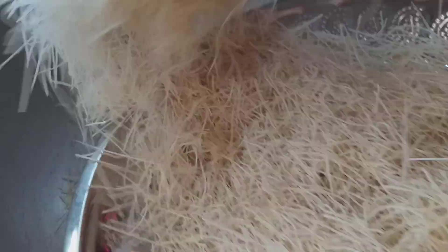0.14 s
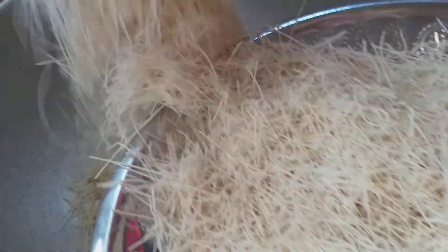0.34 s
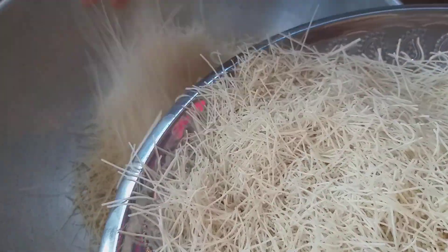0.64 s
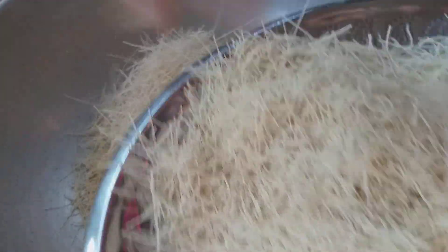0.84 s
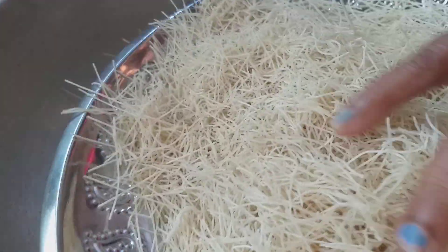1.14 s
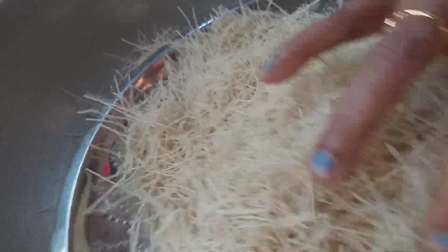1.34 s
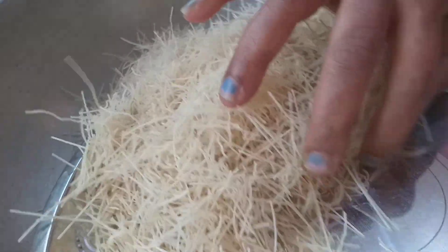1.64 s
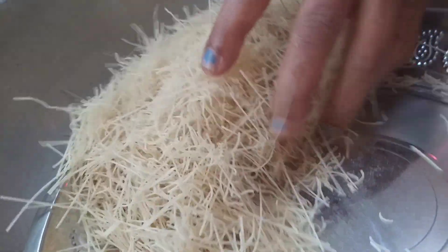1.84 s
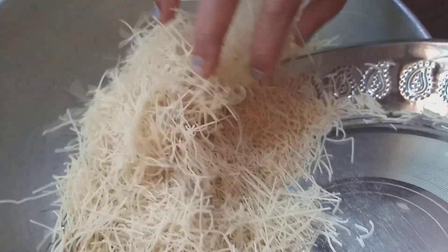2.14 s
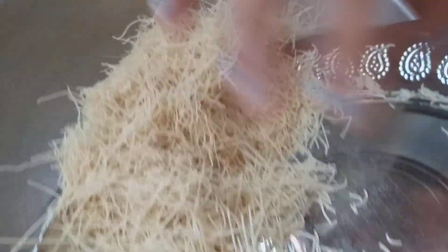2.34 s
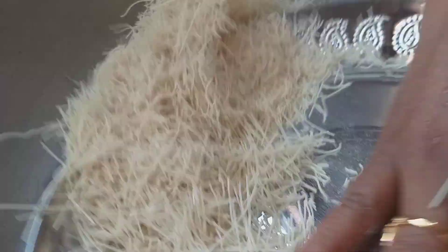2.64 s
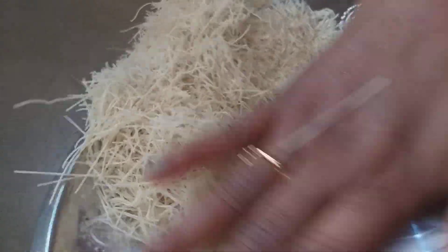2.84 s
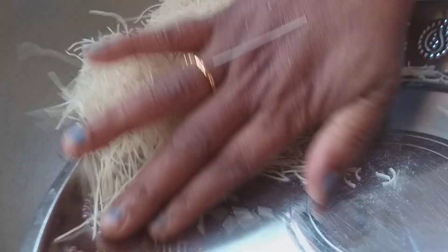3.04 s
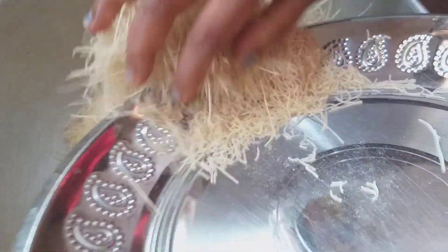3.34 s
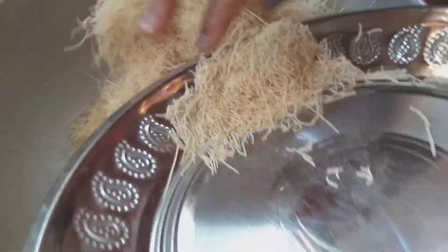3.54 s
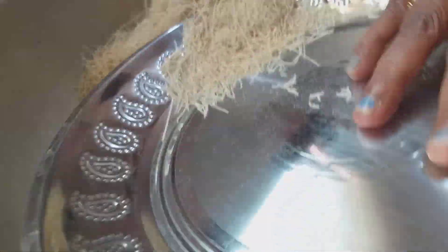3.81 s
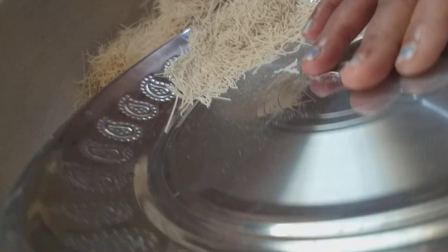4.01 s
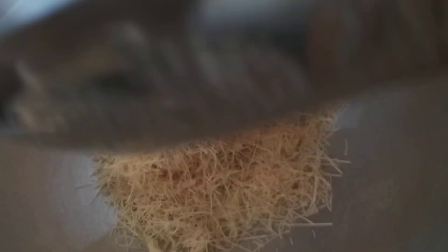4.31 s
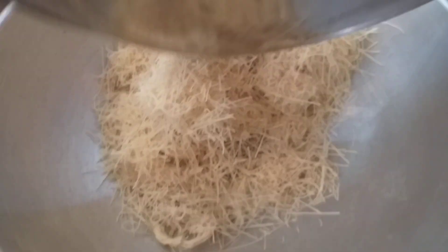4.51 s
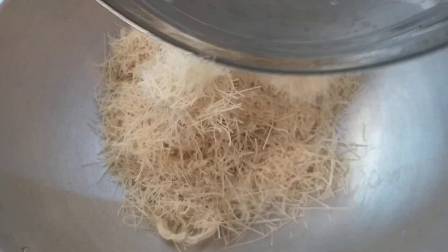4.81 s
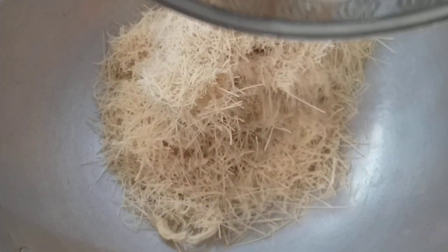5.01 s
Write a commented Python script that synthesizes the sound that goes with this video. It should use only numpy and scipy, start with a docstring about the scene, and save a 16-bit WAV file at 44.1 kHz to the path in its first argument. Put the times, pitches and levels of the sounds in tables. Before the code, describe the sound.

Bright crisp rustling of thin dry noodles swept in bursts from a metal plate into a pan, with sharp snaps and two knocks.

```python
"""Small kitchen with a mains hum: dry vermicelli is pushed by hand off a steel plate into a metal pan.
Strands patter as filtered random ticks; the heap rasps and drums on the plate and stirs the hollow below.
Snaps are cracks with splinter sprays; two knocks are noise bursts with a low flex, then a chatter.
Modes ring the steel, a dull boom fades at the start, soft touches leave notes, a short tail adds the room."""
import sys
import numpy as np
from scipy import signal
from scipy.io import wavfile
from scipy.ndimage import uniform_filter1d

SR = 44100
rng = np.random.default_rng(int(sys.argv[2]) if len(sys.argv) > 2 else 0)


def unload_audio(sound):
    """Save the sound as a 16-bit wav file, at the path given as the first command line argument."""
    columns = np.transpose(np.atleast_2d(sound))
    # keep every value between -1 and 1, then stretch to whole-number steps
    steps = np.round(np.clip(columns, -1, 1) * 32767)
    wavfile.write(sys.argv[1], SR, steps.astype(np.int16))


N = 227720
TIME_S = np.arange(N) / SR
BAND_EDGE_HZ = 15900

# shoves of the heap over the plate: full_force_s, hold_s, rise_s, rasp_db, drum_db, hollow_db
PUSHES = [(0, 0.36, 0.06, -33, -54.5, -57), (1.094, 0.067, .022, -32, -55, -64),
          (1.22, .11, 0.12, -28.5, -51, -59), (1.452, 0.14, 0.45, -26.5, -44.5, -57),
          (1.83, 0.15, 0.24, -27, -59, -54.5), (2.09, .11, 0.25, -34, -51.5, -54),
          (2.373, 0.18, 0.12, -43.5, -55, -58.5), (2.601, 0.034, 0.07, -25.5, -46, -51),
          (2.929, 0.038, 0.18, -18.5, -44.5, -43.5), (3.13, 0.098, 0.19, -21, -48, -53),
          (3.348, .03, .2, -28.5, -71, -53), (3.892, 0.041, 0.039, -36.5, -62, -53.5),
          (4.203, 0.32, 0.42, -50, -58, -55.5), (4.59, .07, 0.15, -29, -60, -73),
          (4.72, 0.03, .1, -34, -67, -47.5), (4.795, 0.0083, 0.024, -24, -53.5, -53)]
# clumps tipping over the rim into the pan: full_flow_s, hold_s, rise_s, level_db
FALLS = [(0, 0.21, .05, -25), (.285, 0.063, 0.12, -19), (.465, 0.019, 0.071, -24.5),
         (.62, 0.021, 0.036, -24.5), (.74, 0.026, 0.081, -34), (1.14, 0.025, 0.088, -56),
         (1.89, 0.11, 0.17, -26.5), (2.1, 0.093, .15, -26), (2.3, 0.068, 0.14, -32),
         (2.61, 0.02, 0.14, -27.5), (2.92, .03, 0.12, -18.5), (3.19, 0.059, 0.12, -21),
         (3.37, 0.011, 0.17, -23.5), (3.55, .22, .14, -26), (3.92, 0.052, 0.19, -31.5),
         (4.26, 0.21, .5, -32.5), (4.65, 0.043, .14, -23.5), (4.8, 0.012, 0.074, -30.5),
         (4.9, .025, 0.052, -40)]
# hollow between plate and pan, shifting as the plate tilts: time_s, resonance_hz
HOLLOW_PITCH = [(0, 1477), (3.45, 1480), (3.83, 1190), (3.96, 1555), (4.08, 1616), (4.36, 1557),
                (4.72, 1462), (5.16, 1450)]
# lingering notes of the hollow: multiple_of_resonance, level_db
HOLLOW_NOTES = [(.66, -8.5), (1, -0.5), (1.61, -11)]
# loudest strands that snap or land hard: start_s, strength_db, splinters_re_crack_db, treble_db
SNAPS = [(0.0142, 10.5, 11, 15), (0.087, 9, 9, 12), (0.154, 5.5, -5, 4), (0.19, 11.5, -2.5, -19),
         (0.214, 14.5, 8, 6), (0.2915, 11.5, 2, 0), (0.3125, 12.5, -1.5, -7), (0.3454, 12, 8, -1),
         (0.4567, 9, 1, 4), (0.485, 7.5, 15, -8), (0.6102, 10.5, 4, 1), (0.6146, 8.5, 3, -10),
         (0.6888, -1.5, -11, -8), (0.757, 7, -15, -3), (0.9175, -18.5, 10, 8), (0.9756, -8, -1, 6),
         (1.071, -11.5, 15, -9), (1.161, 3, -5, -1), (2.109, 4, 3, 8), (2.2794, 3, 0, -1),
         (2.3288, 3.5, 14, 6), (2.4362, 1, 7.5, -2), (2.4842, -3, 3, 5), (3.534, 5.5, 9, -2),
         (3.668, 9.5, -2, -9), (3.777, 2.5, 10, 1), (4.12, -6.5, -8, 8), (4.1585, -3.5, -15, 8),
         (4.268, -1.5, -12, -18), (4.3185, -4, -17, -8), (4.368, -2, -5, -6), (4.3856, 1, 5, 0)]
# blows on the plate: start_s, level_db, flex_re_crunch_db
KNOCKS = [(2.5267, -7, -28.5), (2.586, 7, -26)]
# soft touches of hand and plate: start_s, pitch_hz, level_db, t60_s
TOUCHES = [(0.643, 1508, -34.5, 0.083), (.70, 1540, -50, 0.16), (2.52, 61, -52, 0.33),
           (2.841, 161, -45, 0.13), (3.112, 256, -41, 0.22)]
# modes of the ringing steel: pitch_hz, level_db, t60_s
STEEL_MODES = [(473.5, 7, 0.27), (796, -28, 0.25), (1450, -23, 0.3), (3520, 0.5, 0.23), (4830, -13, .2),
               (5260, -31, 0.14), (7000, -32, 0.19), (7500, -22, .2), (9000, -17, 0.21), (10500, -17, .2),
               (14266, -7, .2)]

# spectrum of strands landing, relative: freq_hz, level_db
PATTER_SPECTRUM = [(100, -37), (900, -29), (1500, -35), (2100, -27.5), (2900, -29), (4000, -17.5),
                   (4900, -8.5), (5700, -3.5), (6250, -14.5), (7400, -1), (8700, 2), (10200, -7),
                   (13000, -6.5), (16000, -12)]
# spectrum of the heap scraping the plate, relative: freq_hz, level_db
RASP_SPECTRUM = [(30, -56), (200, -41), (1100, -22), (2000, -20), (2700, -20), (3300, -5.5), (4200, -3),
                 (5400, -1.5), (6300, -11), (8300, 0), (10500, -8.5), (16000, -7)]
# spectrum of bumps drumming on the plate, relative: freq_hz, level_db
DRUM_SPECTRUM = [(25, -40), (170, -21), (290, -5), (390, -7), (620, -3), (800, -1.5), (950, -5.5),
                 (1150, 0.5), (1700, -13.5), (3000, -17.5)]
# spectrum of a blow on the plate, relative: freq_hz, level_db
KNOCK_SPECTRUM = [(30, -54), (150, -24), (300, -13), (750, -5), (1200, -3), (1650, -9), (2600, -4),
                  (3600, 0.5), (5000, -2.5), (6400, -9), (8300, -1.5), (16000, -12)]
# spectrum of the dull opening boom, relative: freq_hz, level_db
BOOM_SPECTRUM = [(40, -30), (110, -4), (180, -1), (300, -5), (450, -5.5), (620, -6), (760, 4.5), (950, -4),
                 (1350, -1.5), (1800, -18), (4000, -19)]
# spectrum of the faint room noise, relative: freq_hz, level_db
AIR_SPECTRUM = [(20, -44), (70, 13), (170, 12.5), (350, 9), (700, 5), (1400, 5.5), (2600, -13), (5000, -21),
                (16000, -57)]
# decay of the kitchen's tail: freq_hz, t60_s
KITCHEN_DECAY = [(500, 0.42), (4000, 0.52), (8000, 0.18), (16000, 0.29)]
# hum tones, at their full level from 2.2 s on: pitch_hz, rms_db
HUM_TONES = [(100, -60.5), (177, -77), (291, -70.5)]

# decay once the heap stops moving
RASP_FADE_DB_PER_S, PATTER_FADE_DB_PER_S, PLATE_FADE_DB_PER_S = 113, 111, 51.5
# strands shed by every push land a moment later; level re rasp
SHED_DB, SHED_DELAY_S = -6, 0.074
# drumming and hollow stirred by falling strands, re their patter
FALL_DRUM_DB, FALL_HOLLOW_DB = -38.5, -32
NOTE_WIDTH_HZ, NOTE_DB, NOTE_RUB_POWER = 19, -56.5, 0.4
# plate flex, and the bounces after the last blow
FLEX_HZ, FLEX_SAG_HZ_PER_S, FLEX_T60_S = 585, 1200, 0.031
CHATTER_DELAY_S, CHATTER_GAP_S, CHATTER_DB = 0.022, 0.011, -14
CHATTER_FADE_DB_PER_S, CHATTER_FLEX_DB = 155, -23
STRAYS_PER_S, STRAYS_DB = 38, -51


def heap():
    """Strands patter into the pan; the heap rasps over the plate, drums on it and stirs the hollow below."""
    patter_gain, rasp_gain, drum_gain, hollow_gain = motion()

    fine = grains(5000, spread_db=2.0, burst_db=3, bursts_per_s=27, low_hz=4460, high_hz=16200)
    # longer pieces, sparse enough to stand out
    long = grains(70, spread_db=2.5, burst_db=0, bursts_per_s=0, low_hz=6000, high_hz=12000, count=12)
    patter = evened(colour(fine, PATTER_SPECTRUM))
    patter = evened(patter + gain_of(-6) * evened(colour(long, PATTER_SPECTRUM)))

    scrapes = grains(9000, spread_db=2.0, burst_db=6, bursts_per_s=170, low_hz=2700, high_hz=14000)
    rasp = evened(colour(scrapes, RASP_SPECTRUM))

    bumps = grains(2600, spread_db=2.5, burst_db=3.0, bursts_per_s=45, low_hz=634, high_hz=4270)
    drum = evened(colour(bumps, DRUM_SPECTRUM))
    hollow_hz = np.interp(TIME_S, *np.transpose(HOLLOW_PITCH))
    hollow = evened(resonate(resonate(bumps, hollow_hz, 700), hollow_hz, 700))

    # notes favour moments when rasp outweighs drumming: little weight damps the plate
    rubbing = bumps * hollow_gain * (rasp_gain / drum_gain) ** NOTE_RUB_POWER
    notes = np.zeros(N)
    for multiple, db in HOLLOW_NOTES:
        notes += gain_of(NOTE_DB + db) * resonate(rubbing, multiple * hollow_hz, NOTE_WIDTH_HZ)
    return patter * patter_gain + rasp * rasp_gain + drum * drum_gain + hollow * hollow_gain + notes


def motion():
    """Gains of patter, rasp, drumming and hollow, driven by pushes and falling clumps."""
    full_s, hold_s, rise_s, rasp_db, drum_db, hollow_db = np.transpose(PUSHES)
    falling = swells(FALLS, PATTER_FADE_DB_PER_S)
    shed = swells(zip(full_s + SHED_DELAY_S, hold_s, rise_s, rasp_db + SHED_DB), PATTER_FADE_DB_PER_S)
    rasp = swells(zip(full_s, hold_s, rise_s, rasp_db), RASP_FADE_DB_PER_S)
    drum = swells(zip(full_s, hold_s, rise_s, drum_db), PLATE_FADE_DB_PER_S)
    hollow = swells(zip(full_s, hold_s, rise_s, hollow_db), PLATE_FADE_DB_PER_S)
    patter = np.hypot(falling, shed)
    drum = np.hypot(drum, gain_of(FALL_DRUM_DB) * falling)
    hollow = np.hypot(hollow, gain_of(FALL_HOLLOW_DB) * falling)
    return patter, rasp, drum, hollow


def swells(moves, fade_db_per_s):
    """Power sum of moves: each climbs its last 20 dB in rise_s, holds, then fades linearly in dB."""
    power = np.zeros(N)
    for full_s, hold_s, rise_s, db in moves:
        before_s = np.maximum(full_s - TIME_S, 0)
        after_s = np.maximum(TIME_S - full_s - hold_s, 0)
        power += gain_of(db - 20 * (before_s / rise_s) ** 2 - fade_db_per_s * after_s) ** 2
    return np.sqrt(power)


def grains(per_s, spread_db, burst_db, bursts_per_s, low_hz, high_hz, burst_s=0.015, count=32):
    """Random ticks of many strands at many spots; at times one break sets off a brief, louder avalanche."""
    breaks = rng.uniform(0.29, 2.5, N) * (rng.random(N) < bursts_per_s / SR)
    bursts = signal.lfilter([1], [1, -np.exp(-1 / (burst_s * SR))], breaks)
    size_db = spread_db * np.minimum(rng.exponential(1, N), 4.5) + burst_db * np.minimum(bursts, 2)
    clicks = gain_of(size_db) * rng.choice([-1, 1], N) * (rng.random(N) < per_s / SR)
    kind = rng.integers(0, count, N)
    out = np.zeros(N)
    for k, pitch_hz in enumerate(np.geomspace(low_hz, high_hz, count)):
        tick = np.convolve(strand(pitch_hz, 1.44, 0.23), echoes(echo_db=-2, echo_t60_s=0.053))
        out += ring(clicks * (kind == k), tick)
    return evened(out)


def strand(pitch_hz, decay_cycles, tone, size=128):
    """One strand's tick: a click and a few cycles of its bending pitch."""
    cycles = pitch_hz * np.arange(size) / SR
    wave = np.exp(-cycles / decay_cycles) * np.sin(2 * np.pi * cycles)
    wave = tone * wave / np.linalg.norm(wave)
    wave[0] += 1
    return wave / np.linalg.norm(wave)


def echoes(echo_db, echo_t60_s, size=1100):
    """Direct sound plus quick echoes off the pan's walls, drawn anew for every spot."""
    t = np.arange(size) / SR
    response = rng.standard_normal(size) * (t > 0.0006) * gain_of(-60 * t / echo_t60_s)
    response *= gain_of(echo_db) / np.linalg.norm(response)
    response[0] += 1
    return response / np.linalg.norm(response)


def resonate(x, centre_hz, width_hz):
    """Resonance following centre_hz: shift to zero, one-pole lowpass, shift back; rms 1."""
    turn = np.exp(2j * np.pi * np.cumsum(centre_hz * np.ones(N)) / SR)
    pole = np.exp(-np.pi * width_hz / SR)
    return evened((turn * signal.lfilter([1 - pole], [1, -pole], x / turn)).real)


def snaps(splinter_s=0.0069, splinters_per_s=4000, thin_hz=4500, treble_hz=11000, size=1500):
    """Each snap is one crack, then a quick spray of splinters."""
    t, out = np.arange(size) / SR, np.zeros(N)
    thin = signal.butter(1, thin_hz, "high", fs=SR, output="sos")
    treble = signal.butter(2, treble_hz, "high", fs=SR, output="sos")
    for start_s, db, splinter_db, treble_db in SNAPS:
        chance, height = rng.random(size), rng.standard_normal(size)
        pitch_hz = rng.uniform(5500, 11200)
        spray = height * (chance < splinters_per_s / SR) * np.exp(-t / splinter_s)
        crack = gain_of(splinter_db) * spray / (np.linalg.norm(spray) + 1e-9)
        crack[0] += 1
        crack = ring(crack, strand(pitch_hz, 0.66, 0.35))
        crack = ring(crack, echoes(echo_db=0, echo_t60_s=0.013))
        crack = signal.sosfilt(thin, colour(np.pad(crack, 16), PATTER_SPECTRUM))
        crack = crack + (gain_of(treble_db) - 1) * signal.sosfiltfilt(treble, crack)
        add(out, start_s, gain_of(db) * crack / np.linalg.norm(crack))
    return out


def knocks(crunch_db=1, crunch_s=0.0077, lowest_hz=280, size=1600):
    """Every blow crunches the strands on the plate and flexes it into a short low note."""
    t, blows, flexes = np.arange(size) / SR, np.zeros(N), np.zeros(N)
    for start_s, db, flex_db, pitch_hz in [(*row, FLEX_HZ) for row in KNOCKS] + chatter():
        crunch = rng.standard_normal(size) * np.exp(-t / crunch_s)
        blow = gain_of(crunch_db) * crunch / np.linalg.norm(crunch)
        blow[0] += 1
        add(blows, start_s, gain_of(db) * blow)
        flex_gain = gain_of(db + flex_db - 60 * t / FLEX_T60_S)
        add(flexes, start_s, flex_gain * np.sin(2 * np.pi * pitch_hz * t))
    low_cut = signal.butter(2, lowest_hz, "high", fs=SR, output="sos")
    return signal.sosfilt(low_cut, colour(blows, KNOCK_SPECTRUM) + flexes)


def chatter(count=6):
    """Ever weaker, lower bounces after the last blow: rows of start_s, level_db, flex_db, pitch_hz."""
    blow_s, blow_db, _ = KNOCKS[-1]
    delays_s = CHATTER_DELAY_S + CHATTER_GAP_S * (np.arange(count) + rng.uniform(-0.2, 0.24, count))
    rows = []
    for delay_s in delays_s:
        db = blow_db + CHATTER_DB - CHATTER_FADE_DB_PER_S * (delay_s - CHATTER_DELAY_S)
        rows.append((blow_s + delay_s, db, CHATTER_FLEX_DB, FLEX_HZ - FLEX_SAG_HZ_PER_S * delay_s))
    return rows


def strays():
    """Single strands keep settling in the pan, even while the heap lies still."""
    ticks = grains(STRAYS_PER_S, spread_db=0.5, burst_db=0, bursts_per_s=0, low_hz=6000, high_hz=12000, count=6)
    return gain_of(STRAYS_DB) * evened(colour(ticks, PATTER_SPECTRUM))


def touches(rise_s=0.002):
    """Each soft touch leaves one dying note, roughened by a straying phase."""
    t, out = TIME_S[:SR // 2], np.zeros(N)
    for start_s, pitch_hz, db, t60_s in TOUCHES:
        wobble = evened(uniform_filter1d(rng.standard_normal(len(t)), round(10 * SR / pitch_hz)))
        envelope = gain_of(db - 60 * t / t60_s) * (1 - np.exp(-t / rise_s))
        add(out, start_s, envelope * np.sin(2 * np.pi * pitch_hz * t + wobble))
    return out


def boom(level_db=-30, t60_s=0.61):
    """A dull, hollow boom of filtered noise dies away at the start."""
    return colour(rng.standard_normal(N), BOOM_SPECTRUM) * gain_of(level_db - 60 * TIME_S / t60_s)


def steel(x, ring_db=-5):
    """Every tick feeds the decaying modes of the metal."""
    t = TIME_S[:SR // 2]
    modes = np.zeros(len(t))
    for pitch_hz, db, t60_s in STEEL_MODES:
        unit_peak = 2 * np.log(1000) / (t60_s * SR)  # about unit gain at resonance
        modes += gain_of(db - 60 * t / t60_s) * np.cos(2 * np.pi * pitch_hz * t) * unit_peak
    return x + gain_of(ring_db) * ring(x, modes)


def space(x, room_db=-10):
    """The kitchen's short tail: noise with a decay time per frequency."""
    t = TIME_S[:SR // 2]
    hz, when_s, z = signal.stft(rng.standard_normal(len(t)) * (t > 0.006), SR, nperseg=256)
    decay = gain_of(-60 * when_s / read(KITCHEN_DECAY, hz)[:, None])
    tail = signal.istft(z * decay, SR, nperseg=256)[1][:len(t)]
    response = gain_of(room_db) * tail / np.linalg.norm(tail)
    response[0] += 1
    return ring(x, response / np.linalg.norm(response))


def background(air_db=-64):
    """Hum tones over faint room noise; both sink together until 1.1 s, then rise to full level at 2.2 s."""
    hum = np.zeros(N)
    for pitch_hz, db in HUM_TONES:
        hum += gain_of(db) * np.sqrt(2) * np.sin(2 * np.pi * (pitch_hz * TIME_S + rng.random()))
    air = gain_of(air_db) * colour(rng.standard_normal(N), AIR_SPECTRUM)
    sag_db = np.interp(TIME_S, [0, 1.1, 2.2], [-2, -5, 0])
    return gain_of(sag_db) * (hum + air)


def narrow_band(x, centre_hz, q, spread):
    """A narrow resonance with steep skirts."""
    skirts = signal.butter(3, [centre_hz / spread, centre_hz * spread], "band", fs=SR, output="sos")
    return signal.sosfiltfilt(skirts, signal.lfilter(*signal.iirpeak(centre_hz, q, fs=SR), x))


def colour(x, spectrum, size=4096):
    """Minimum-phase filter of unit energy: clicks keep their sharp front."""
    log_gain = np.log(gain_of(read(spectrum, abs(np.fft.fftfreq(size, 1 / SR)))))
    response = np.fft.ifft(np.exp(np.conj(signal.hilbert(log_gain)))).real[:size // 2]
    return ring(x, response / np.linalg.norm(response))


def read(points, hz):
    """A table read on a log-frequency axis."""
    point_hz, value = np.transpose(points)
    return np.interp(np.log(hz + 1), np.log(point_hz + 1), value)


def ring(x, response):
    """Convolution, cut to at most the scene's length."""
    return signal.oaconvolve(x, response)[:N]


def add(mix, start_s, sound):
    """Mixes a sound in at start_s."""
    part = mix[max(round(start_s * SR), 0):][:len(sound)]
    part += sound[:len(part)]


def evened(x):
    """Scaled to rms 1."""
    return x / np.sqrt(np.mean(x ** 2) + 1e-20)


def gain_of(db):
    """Decibels to amplitude gain."""
    return 10 ** (np.asarray(db) / 20)


def scene():
    """All sources, nearly mono; a narrow band of the sparkle leans to the right."""
    struck = steel(heap() + strays() + snaps() + knocks())
    mono = space(struck + boom() + touches()) + background()
    side = -0.27 * narrow_band(mono, 9480, 18, 1.175)
    return np.array([mono + side, mono - side])


def record(dry, low_cut_hz=48):
    """Low cut, clipping at full scale, then a steep treble limit."""
    lean = signal.sosfilt(signal.butter(2, low_cut_hz, "high", fs=SR, output="sos"), dry)
    band_limit = signal.firwin(511, BAND_EDGE_HZ, window=("kaiser", 9), fs=SR)
    return signal.oaconvolve(np.clip(lean, -1, 1), band_limit[None], "same")


dry = scene()
out = record(dry)
unload_audio(out)
```